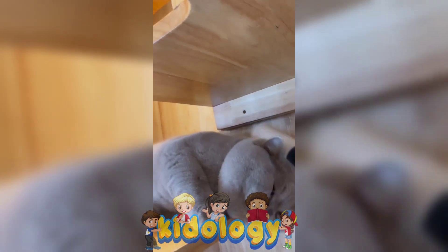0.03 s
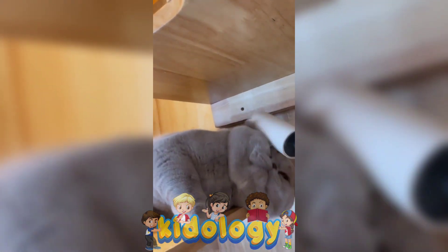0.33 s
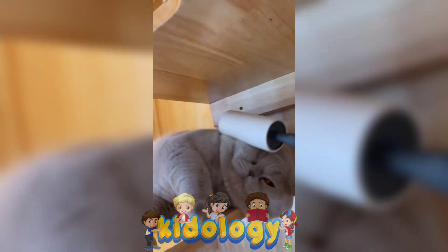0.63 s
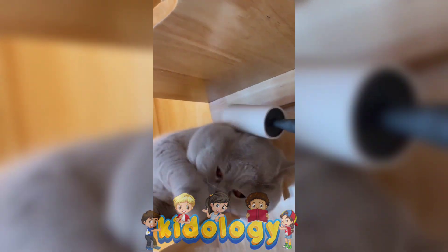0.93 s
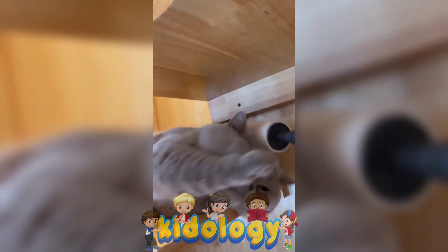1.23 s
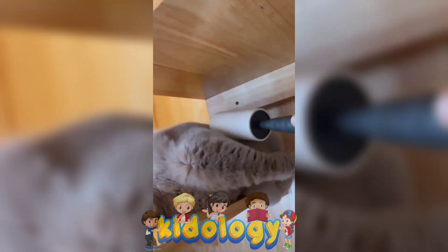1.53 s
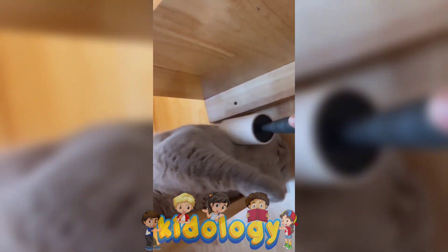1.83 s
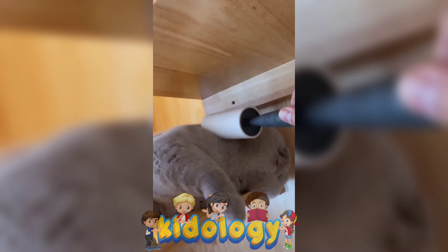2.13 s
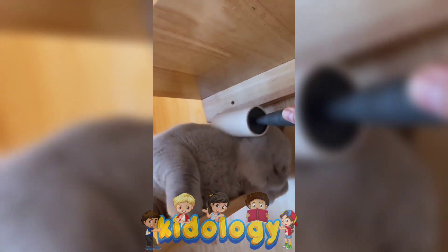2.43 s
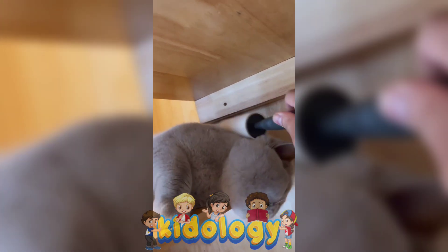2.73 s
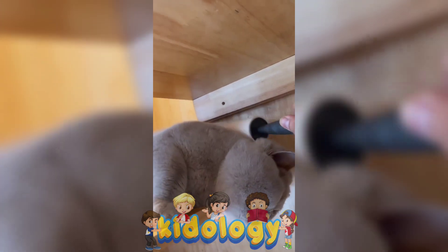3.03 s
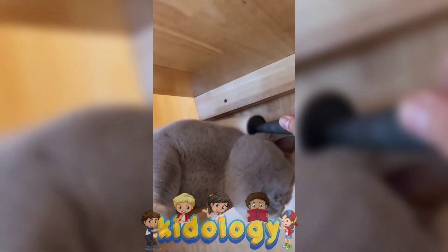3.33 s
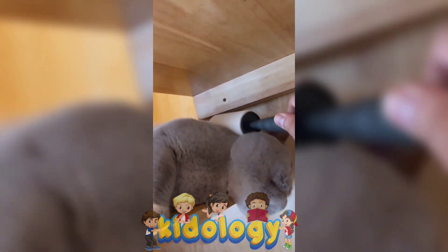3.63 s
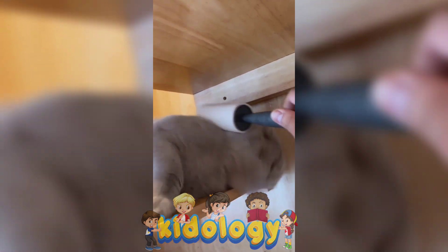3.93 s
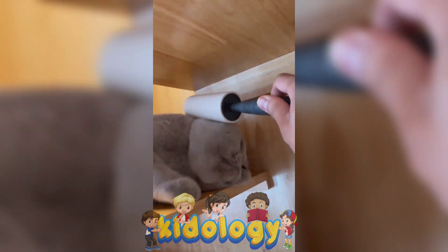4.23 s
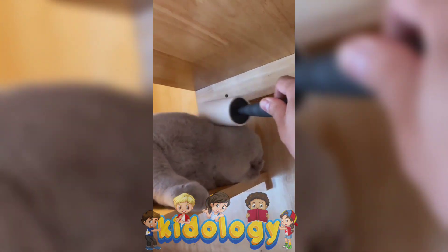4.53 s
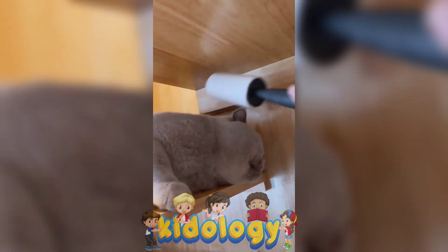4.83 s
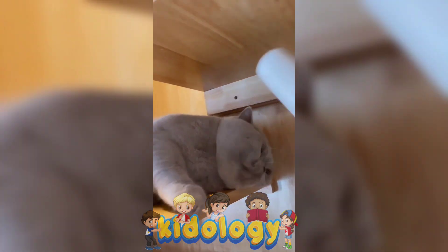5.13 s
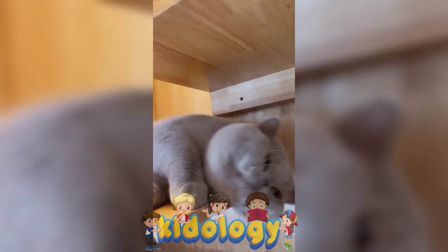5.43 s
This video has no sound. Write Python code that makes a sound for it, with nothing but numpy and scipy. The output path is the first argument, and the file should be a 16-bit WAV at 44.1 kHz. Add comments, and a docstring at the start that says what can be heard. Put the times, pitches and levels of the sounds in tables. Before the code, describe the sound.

A sticky lint roller is worked over a cat's fur in a wooden cubby, heard close up, with a low rumble from the boards and a steady room hum throughout. From the start, short, uneven strokes make soft, crackling swishes, and the loose plastic drum clicks and knocks hollowly on its axle. A sharper knock and snap come at about 1.3 seconds, followed by quieter rolling. Another snap comes near 3 seconds; the knocks then crowd together, with dull nudges against the shelf and a faint creak. The strongest swish arrives around 4 seconds with a brief hollow ring, and a few more clicks follow until 4.6. At about 5.1 seconds the wood takes a heavy, booming thump with a short scrape, the loudest moment. At about 5.6 the roller is put down with a bright double clack and a low bump.

```python
"""Lint-rolling a cat

A sticky lint roller is worked in short strokes over a cat lying in a wooden cubby, close by.
Each stroke peels hairs off the tape in a crackling swish, the loose plastic drum knocks on
its axle and the boards rumble underneath. Near the end the wood takes a heavy thump, then
the roller is put down with a clack. The room hums throughout."""
import sys
import numpy as np
from scipy import signal
from scipy.fft import rfft, irfft, next_fast_len
from scipy.io import wavfile
from scipy.ndimage import uniform_filter1d

SR = 44100
rng = np.random.default_rng(int(sys.argv[2]) if len(sys.argv) > 2 else 0)


def unload_wav(signal):
    """Save mono or channel-first audio to the path in sys.argv[1] as 16-bit WAV at rate SR, clipped to [-1, 1]."""
    wavfile.write(
        sys.argv[1],
        SR,
        np.round(np.clip(np.atleast_2d(signal).T, -1, 1) * 32767).astype(np.int16),
    )


N = 250796


# Pushes of the roller over the fur: middle_s, length_s, level_db
ROLLER_STROKES = [(0.228, 0.8, -43.5), (0.62, 0.18, -45.5), (0.867, 0.27, -41.5), (1.238, 0.32, -39),
                  (1.438, 0.39, -49.5), (1.676, 0.12, -48), (1.777, 0.33, -51), (2.12, 0.96, -49),
                  (2.457, 0.35, -47), (2.772, 0.98, -49.5), (3.093, 0.19, -44.5), (3.393, 0.65, -45),
                  (3.645, 0.17, -44.5), (3.846, 0.4, -40.5), (3.998, 0.4, -34.5), (4.19, 0.43, -50.5),
                  (4.622, 0.4, -46.5), (5.316, 1, -48)]
def strokes(resting_db=-69.5, steepness=3.56):
    """The peeling level in dB: each push speeds up and slows down, with a faint creep in between."""
    power = from_db(resting_db) ** 2
    for middle_s, length_s, level_db in ROLLER_STROKES:
        power = power + from_db(level_db) ** 2 * swell(middle_s, length_s) ** steepness
    return 10 * np.log10(power)


# The tone of the peeling swish as heard, with a deep gap near 9 kHz: pitch_hz, gain_db
PEEL_TONE = [(800, -24), (2600, -4.5), (4300, -2.5), (4900, -4.5), (7000, -0.5), (8300, 3.5), (8900, -30),
             (9350, -56), (9750, 13), (10900, -3), (11400, -48)]
def peel(speed_db, tufts):
    """Hairs let go of the tape one by one; faster rolling frees more of them."""
    hairs = grains(per_s=9000 * from_db(0.25 * speed_db), spread_db=2.0)
    return rms_one(colour(hairs * tufts, PEEL_TONE))


# The tone of tearing glue: pitch_hz, gain_db
GLUE_TONE = [(1500, -4), (7500, -1), (9100, -5), (10000, 14.5), (12300, -18)]
def crackle(speed_db, tufts):
    """Glue tears loose in uneven ticks that stand out in the fast strokes."""
    tears = grains(per_s=1500, spread_db=8.0)
    return rms_one(colour(tears * tufts, GLUE_TONE)) * from_db(-61.5 + 2.22 * speed_db)


# The tone of the drum brushing the coat: pitch_hz, gain_db
RUB_TONE = [(270, -4.5), (410, 4), (750, 7), (1200, -1.5), (3000, -8), (5000, -7.5), (9000, -64)]
def rub(speed_db, press_db, tufts):
    """The drum brushes through the coat, louder with more speed and more pressure."""
    brushing = grains(per_s=700, spread_db=-0.5)
    level_db = -47 + 0.77 * speed_db + 0.51 * press_db
    return rms_one(colour(brushing * tufts, RUB_TONE)) * from_db(level_db)


def rattle(press_db):
    """The hollow drum chatters on its axle, louder as the hand presses down."""
    taps = grains(per_s=260, spread_db=2.5)
    return rms_one(resonate(taps, DRUM_RINGS)) * from_db(-43.5 + 1.82 * press_db)


def rolling(usual_peel_db=-48, usual_pressure_db=-26.5):
    """The hand's speed and pressure drive the peeling, crackling, rubbing and rattling together."""
    peel_db = strokes()
    pressure_db, = in_time(HAND_PRESSURE)
    speed_db = peel_db - usual_peel_db
    press_db = pressure_db - usual_pressure_db
    tufts = from_db(2.63 * drift(70))  # the tape catches and frees whole tufts
    hairs = from_db(peel_db) * peel(speed_db, tufts)
    return hairs + crackle(speed_db, tufts) + rub(speed_db, press_db, tufts) + rattle(press_db)


# The notes of the hollow drum (a wider note dies sooner): pitch_hz, width_hz, gain_db
DRUM_RINGS = [(385, 100, 5.5), (491, 59, 10), (644, 168, 10), (975, 202, 7.5), (1370, 350, 0),
              (2576, 100, -3.5), (3070, 150, -1)]
# The notes of the plastic hub and handle: pitch_hz, width_hz, gain_db
HUB_RINGS = [(1497, 196, 2), (2130, 280, 4.5), (2626, 240, -4.5), (3110, 85, 4), (3900, 4400, 0),
             (5330, 1300, -7.5)]
# Knocks of the drum on its axle: start_s, tock_db, crack_db
AXLE_KNOCKS = [(.383, -29.5, -39), (0.477, -40, -46), (0.489, -41, -52), (0.733, -39, -49),
               (0.858, -42, -41.5), (1.063, -37.5, -40.5), (1.176, -32.5, -40.5), (1.227, -30, -48),
               (1.262, -34, -44), (1.275, -18.5, -23), (1.506, -36, -54), (1.567, -41, -50),
               (2.067, -41.5, -49), (2.288, -38, -51), (2.415, -35.5, -39), (2.668, -32.5, -37),
               (2.926, -39, -46.5), (2.962, -29.5, -31), (3.111, -32.5, -45.5), (3.146, -34, -46.5),
               (3.224, -36, -58), (3.237, -32, -44), (3.3, -26, -49), (3.311, -24.5, -49),
               (3.324, -26.5, -31), (3.366, -22.5, -41), (3.376, -25, -40), (3.414, -27, -39.5),
               (3.446, -28, -57), (3.51, -28, -42.5), (3.526, -28, -36.5), (3.55, -27.5, -46),
               (3.589, -32.5, -52), (3.638, -37, -44.5), (3.659, -24.5, -29), (3.754, -28, -37.5),
               (3.824, -19.5, -65), (3.876, -36, -42), (3.933, -23.5, -39), (3.948, -24, -38),
               (3.986, -25, -42), (4.075, -29.5, -35.5), (4.095, -29, -33.5), (4.118, -29, -31),
               (4.209, -33.5, -43.5), (4.468, -34, -43), (4.551, -33.5, -46.5), (4.572, -35, -44),
               (4.598, -27.5, -30.5)]
def knocks():
    """The loose drum drops against its axle: the hollow tube tocks and the hub cracks."""
    out = np.zeros((2, N))
    for start_s, tock_db, crack_db in AXLE_KNOCKS:
        hardness_db = crack_db - tock_db  # a harder knock reaches higher notes
        centre_hz = 830 * from_db(0.23 * hardness_db)
        top_hz = 8000 * from_db(0.78 * hardness_db)
        tube = [(hz, width, db - 10 * abs(np.log2(hz / centre_hz)) + 2 * rng.normal())
                for hz, width, db in DRUM_RINGS]
        # the drum has turned since the last knock, so the hub answers a little differently
        hub = [(hz * (1 + 0.034 * rng.normal()), width, db + 2 * rng.normal())
               for hz, width, db in HUB_RINGS]
        tube_hit = contact(snap=4.9, chatter_s=0.019, tail_db=-27, tail_s=0.088)
        tube_ring = resonate(low_pass(tube_hit, 2 * centre_hz), tube)
        tock = hit_level(bend(tube_ring))
        hub_hit = contact(snap=5.0, chatter_s=0.019, tail_db=-14, tail_s=0.2)
        crack = hit_level(low_pass(resonate(hub_hit, hub), top_hz))
        add(out, start_s, from_db(tock_db) * tock + from_db(crack_db) * crack)
    return out


# The notes of the whole roller ringing freely: pitch_hz, width_hz, gain_db
ROLLER_RINGS = [(1440, 260, 11.5), (2320, 160, 14.5), (2920, 170, 9.5), (4020, 300, 4.5), (5260, 760, 3.5),
                (8060, 210, 10)]
# The roller is put down: start_s, strength_db, top_hz
LANDINGS = [(5.563, -6.5, 8000), (5.665, -16, 2640)]
def clacks():
    """Hard plastic lands on a hard surface and rings out into the room."""
    out = np.zeros((2, N))
    for start_s, strength_db, top_hz in LANDINGS:
        blow = contact(snap=8.0, chatter_s=0.06, tail_db=-3, tail_s=0.25)
        ring = resonate(blow, ROLLER_RINGS) + from_db(7.0) * resonate(blow, DRUM_RINGS)
        add(out, start_s, from_db(strength_db - 11.5) * hit_level(low_pass(ring, top_hz)))
    return out


# The notes of the cubby's boards: pitch_hz, level_db, fade_s
BOARD_RINGS = [(52, -10, 0.96), (77.1, -4.5, 0.58), (101.45, -11, 0.82), (182.1, -7.5, 0.31),
               (211.4, -4, 0.28), (317, -13, 0.37), (387.5, -10, 0.25), (523, -4.5, 0.11),
               (692, 1.5, 0.065)]
# Blows on the cubby: start_s, strength_db, contact_s
CUBBY_BLOWS = [(5.111, -6, 0.0055), (5.139, -8.5, 0.0016), (5.2, -9.5, 0.0069), (5.598, -21, 0.0015),
               (5.637, -20, 0.0029)]
def thumps(size=32768):
    """Soft, heavy blows swing the boards and the cubby booms; a shorter contact sounds brighter."""
    out = np.zeros((2, N))
    swing = ringing(BOARD_RINGS, size) * DIRECT_ONLY
    for start_s, strength_db, contact_s in CUBBY_BLOWS:
        build_and_fade = (1 - dying(0.059, size)) * dying(0.44, size)
        thump = low_pass(swing + from_db(-2.0) * boom(size) * build_and_fade, 1.24 / contact_s)
        add(out, start_s, from_db(strength_db) * thump)
    return out


# The tone of the booming cubby: pitch_hz, gain_db
BOOM_TONE = [(30, -35), (75, 11), (140, -6), (220, 0), (750, -13), (1200, -21), (5000, -65)]
def boom(size):
    """The deep, hollow noise inside a thump."""
    return rms_one(colour(noise(size), BOOM_TONE))


def scuff(middle_s=5.122, half_length_s=0.025, level_db=-37):
    """A short, bright scrape comes with the thump."""
    slide = np.exp(-((np.arange(N) / SR - middle_s) / half_length_s) ** 6)
    scrape = resonate(noise(), [(1670, 1500, 12.3), (5670, 560, 14.0), (10600, 6100, 4.4)])
    return from_db(level_db) * slide * rms_one(scrape)


# Dry snaps of the plastic: start_s, level_db
PLASTIC_SNAPS = [(1.274, -28), (2.963, -29), (3.322, -46), (4.241, -46), (4.6, -38.5)]
def snaps():
    """Stiff plastic slips all at once: a bright click with hardly any ring."""
    out = np.zeros((2, N))
    for start_s, level_db in PLASTIC_SNAPS:
        slip = contact(snap=7.0, chatter_s=0.018, tail_db=-12, tail_s=0.1)
        click = resonate(slip, [(5000, 5800, -0.88), (10900, 900, -0.12)])
        add(out, start_s, from_db(level_db) * hit_level(click))
    return out


# Squeaks of the axle: middle_s, length_s, pitch_hz, level_db
AXLE_SQUEAKS = [(0.148, 0.73, 7200, -59), (2.86, 0.52, 7230, -57.5), (3.415, 0.43, 3050, -48.5)]
def squeaks(width_hz=190):
    """The dry axle sticks and slips: thin and high in light turns, a lower creak under load."""
    out = np.zeros((2, N))
    for middle_s, length_s, pitch_hz, level_db in AXLE_SQUEAKS:
        slips = grains(per_s=540, spread_db=2.5)
        squeak = rms_one(resonate(slips, [(pitch_hz, width_hz, 0)]))
        out += from_db(level_db) * swell(middle_s, length_s) * squeak
    return out


# How loud the drum's lowest note is: time_s, level_db
DRONE_LEVELS = [(3.7, -57), (3.85, -33), (4.42, -45), (4.6, -65)]
def drone(width_hz=41):
    """Around the loudest strokes, the drum's lowest note keeps sounding."""
    level_db, = in_time(DRONE_LEVELS)
    lowest_hz = DRUM_RINGS[0][0]
    return from_db(level_db) * rms_one(resonate(noise(), [(lowest_hz, width_hz, 0)]))


# The notes of the shelf: pitch_hz, level_db, fade_s
SHELF_RINGS = [(100.4, 3, 0.08), (179.7, -11, 0.33)]
# The roller nudges the shelf: start_s, strength_db
SHELF_NUDGES = [(2.762, -15), (3.017, -21.5), (3.338, -13), (3.379, -15), (3.522, -13.5), (3.567, -14.5),
                (3.94, -15.5)]
def nudges(size=16384):
    """Pushes cushioned by the cat give the shelf a short, dull swing."""
    out = np.zeros((2, N))
    swing = low_pass(ringing(SHELF_RINGS, size), 350) * DIRECT_ONLY
    for start_s, strength_db in SHELF_NUDGES:
        add(out, start_s, from_db(strength_db) * swing)
    return out


# How hard the hand presses, given as the rumble it makes: time_s, level_db
HAND_PRESSURE = [(2.6, -32.5), (2.8, -32), (3.38, -25.5), (3.62, -31), (3.95, -30), (4.5, -33),
                 (5.57, -34.5), (5.62, -20.5)]
# The tone of the rumbling boards: pitch_hz, gain_db
RUMBLE_TONE = [(25, -34), (55, 1.5), (102, 8.5), (145, -3), (185, -4), (240, -14.5), (700, -17),
               (1500, -78)]
def rumble():
    """Pressure on the roller passes through the cat into the boards."""
    level_db, = in_time(HAND_PRESSURE)
    shake = colour(noise(), RUMBLE_TONE)
    local_power = uniform_filter1d(np.mean(shake ** 2, axis=0), size=2048)
    steady_shake = shake / np.sqrt(local_power + 1e-12)
    return from_db(level_db) * steady_shake


# The room's humming notes: pitch_hz, level_db
HUM_NOTES = [(76, -45.5), (102.3, -41)]
# The room's soft noise: pitch_hz, level_db_per_hz
ROOM_NOISE = [(38, -72), (50, -65), (105, -50), (150, -89), (350, -68), (700, -88.5), (1000, -78.5),
              (2000, -99), (6300, -102.5), (9400, -97), (10400, -89), (11400, -122)]
def room():
    """Low room noise and a hum that wavers in level and pitch."""
    t = np.arange(N) / SR
    hum = 0
    for pitch_hz, level_db in HUM_NOTES:
        gain = from_db(level_db + 2.0 * drift(2.84))
        hum += gain * np.sin(2 * np.pi * pitch_hz * t + 0.42 * drift(13))
    air = colour(noise(), ROOM_NOISE) * np.sqrt(SR / 2)
    return air + np.sqrt(2) * hum * DIRECT_ONLY


def cubby(x, echo_db, fade_s, size=8192):
    """Close wooden walls add quick echoes that ripple the tone but keep its overall balance."""
    echoes = noise(size) * dying(fade_s, size)
    echoes *= from_db(echo_db) / np.sqrt(np.sum(echoes ** 2, axis=1, keepdims=True))
    ripple = 1 + rfft(echoes)
    ripple /= np.sqrt(uniform_filter1d(np.abs(ripple) ** 2, size=64))
    response = np.roll(irfft(ripple), size // 2, axis=1)
    return signal.fftconvolve(x, response, axes=1)[:, size // 2:size // 2 + N]


# How left and right compare: pitch_hz, likeness (0 to 1), left_lead_radians, left_louder_db
LEFT_AND_RIGHT = [(84.5, 0.99, 0, 3.5), (178, 0.95, 1.63, 5), (276, 0.68, 1.23, 5), (442, 0.51, -2.5, 8.5),
                  (1052, 1, -2, 0.5), (1750, 0.94, 0, 0), (3530, 0.14, 1, -0.5), (4590, 0.8, 1.76, 0),
                  (5570, 0.95, 6.5, -0.5), (8850, 1, 9, 0.5), (10550, 0.22, 10, -0.5)]
def stereo(x, size=262144):
    """Direct and scattered sound reach two microphone openings, in a way that changes with pitch."""
    likeness, lead_radians, balance_db = in_frequency(LEFT_AND_RIGHT, size)
    likeness = np.clip(likeness, 0, 1)
    direct, scattered = rfft(x, size) * np.sqrt([(1 + likeness) / 2, (1 - likeness) / 2])
    left = (direct + scattered) * from_db(balance_db / 2)
    right = (direct - scattered) * from_db(-balance_db / 2) * np.exp(-1j * lead_radians)
    return irfft(np.array([left, right]), size)[:, :N]


DIRECT_ONLY = [[1], [0]]  # fills the direct row and leaves the scattered row silent
def noise(size=N):
    """White noise in two unrelated rows: direct and scattered sound."""
    return rng.standard_normal((2, size))


def grains(per_s, spread_db):
    """Tiny snaps of uneven size at random moments."""
    sizes = from_db(spread_db * np.minimum(rng.exponential(1, N), 4))
    return rms_one(noise() * sizes * (rng.random(N) < per_s / SR))


def contact(snap, chatter_s, tail_db, tail_s, size=16384):
    """Two things touch: a snap, brief chatter and a longer, quieter tail."""
    burst = noise(size) * (dying(chatter_s, size) + from_db(tail_db) * dying(tail_s, size))
    burst[:, 0] += snap
    return burst


def resonate(x, notes):
    """Let a sound ring an object's notes (pitch_hz, width_hz, gain_db), every other one flipped."""
    out = 0
    for k, (pitch_hz, width_hz, gain_db) in enumerate(notes):
        decay = np.exp(-np.pi * width_hz / SR)
        feed = (1 - decay * decay) / 2 * np.array([1, 0, -1])
        feedback = [1, -2 * decay * np.cos(2 * np.pi * pitch_hz / SR), decay * decay]
        out = out + (-1) ** k * from_db(gain_db) * signal.lfilter(feed, feedback, x)
    return out


def ringing(notes, size):
    """Struck wood swings freely as a sum of fading notes."""
    t = np.arange(size) / SR
    return sum(from_db(db) * np.sin(2 * np.pi * hz * t) * dying(fade_s, size) for hz, db, fade_s in notes)


def bend(x, sharp_share=0.13, settle_s=0.006):
    """A ring starts a little high and sinks as the contact lets go."""
    steps = np.arange(x.shape[-1])
    position = np.cumsum(1 + sharp_share * np.exp(-steps / SR / settle_s)) - 1
    return np.array([np.interp(position, steps, part) for part in x])


def swell(middle_s, length_s):
    """A movement that gathers speed, peaks at its middle and stops."""
    offset = np.clip((np.arange(N) / SR - middle_s) / length_s, -.5, .5)
    return np.maximum(np.cos(np.pi * offset), 0)


def dying(fade_s, size):
    """A fade that falls 60 dB in fade_s."""
    return np.exp(-np.log(1000) * np.arange(size) / SR / fade_s)


def drift(per_s):
    """A random wander around zero, with per_s new values a second."""
    points = rng.standard_normal(4096)
    return np.interp(np.arange(N) / SR * per_s, np.arange(len(points)), points)


def in_time(rows):
    """Join a table's rows into curves over time."""
    time_s, *columns = np.transpose(rows)
    return [np.interp(np.arange(N) / SR, time_s, column) for column in columns]


def in_frequency(rows, size):
    """Join a table's rows into curves over pitch."""
    pitch_hz, *columns = np.transpose(rows)
    bins_hz = np.maximum(np.arange(size // 2 + 1) * SR / size, 1)
    return [np.interp(np.log(bins_hz), np.log(pitch_hz), column) for column in columns]


def colour(x, tone):
    """Turn each pitch up or down as a tone table says."""
    length = x.shape[-1]
    size = next_fast_len(length, True) * 2
    gain_db, = in_frequency(tone, size)
    return irfft(rfft(x, size) * from_db(gain_db), size)[..., :length]


def low_pass(x, top_hz):
    """Gently dull the sound above top_hz."""
    return signal.sosfilt(signal.butter(2, min(top_hz, .45 * SR), fs=SR, output="sos"), x)


def from_db(db):
    """Turn decibels into a multiplier."""
    return 10 ** (np.asarray(db) / 20)


def rms_one(x):
    """Scale a sound to an average power of 1."""
    return x / np.sqrt(np.mean(x ** 2) + 1e-20)


def hit_level(x, size=512):
    """Scale a hit so that its first instant has a power of 1."""
    return x / np.sqrt(np.mean(x[:, :size] ** 2) + 1e-20)


def add(out, start_s, sound):
    """Mix a sound in at start_s."""
    at = int(np.clip(round(start_s * SR), 0, N - 1))
    out[:, at:at + sound.shape[-1]] += sound[..., :N - at]


def scene():
    """The roller, the wood and the room, heard close up in stereo."""
    roller = cubby(rolling() + knocks() + scuff(), echo_db=-0.5, fade_s=0.066)
    deep_bass_cut = signal.butter(4, 40, "high", fs=SR, output="sos")
    wood = signal.sosfilt(deep_bass_cut, thumps() + nudges())
    return stereo(roller + snaps() + squeaks() + drone() + clacks() + wood + rumble() + room())


def record(dry):
    """Round off the loudest peaks and cut the highest treble."""
    ceiling, top_hz = .92, 12300
    rounded = dry / (1 + (dry / ceiling) ** 4) ** (1 / 4)
    return signal.sosfilt(signal.ellip(10, .1, 80, top_hz, fs=SR, output="sos"), rounded)


dry = scene()
out = record(dry)
unload_wav(out)
```